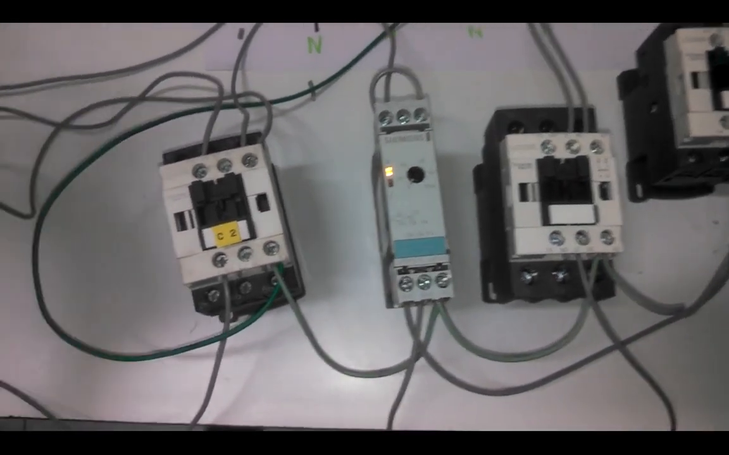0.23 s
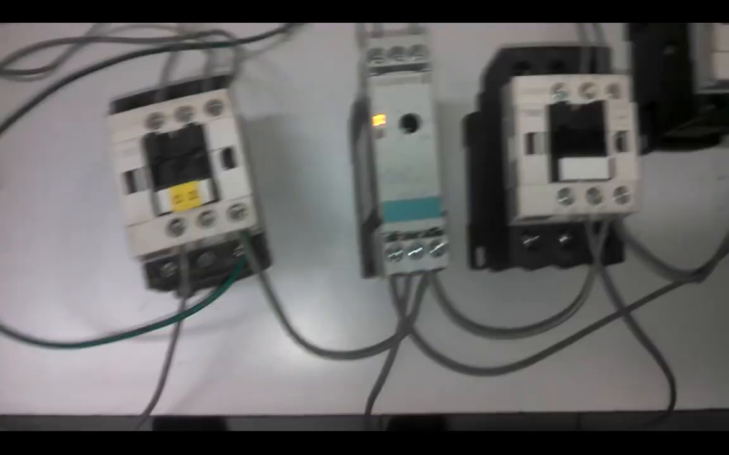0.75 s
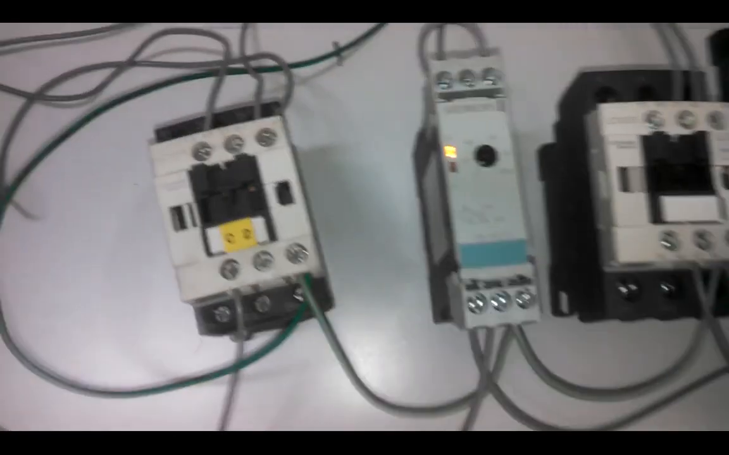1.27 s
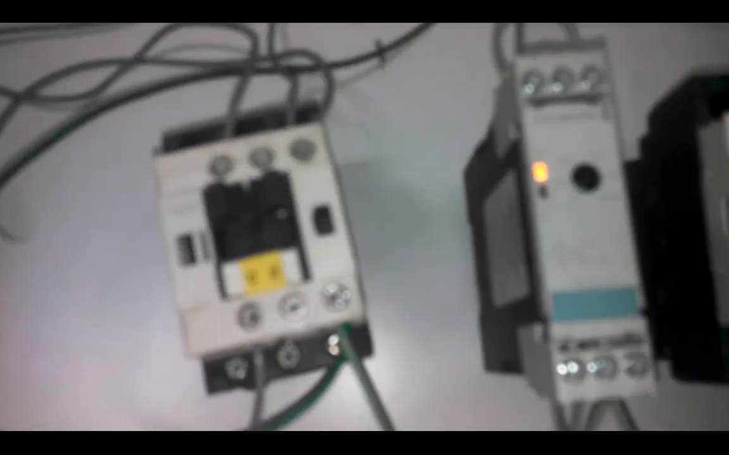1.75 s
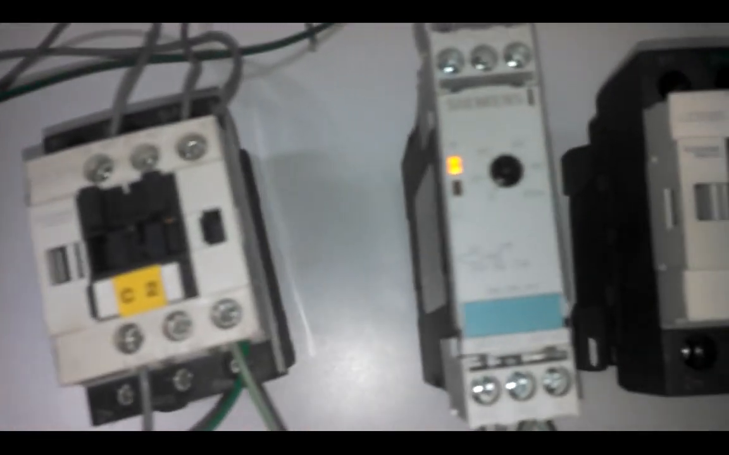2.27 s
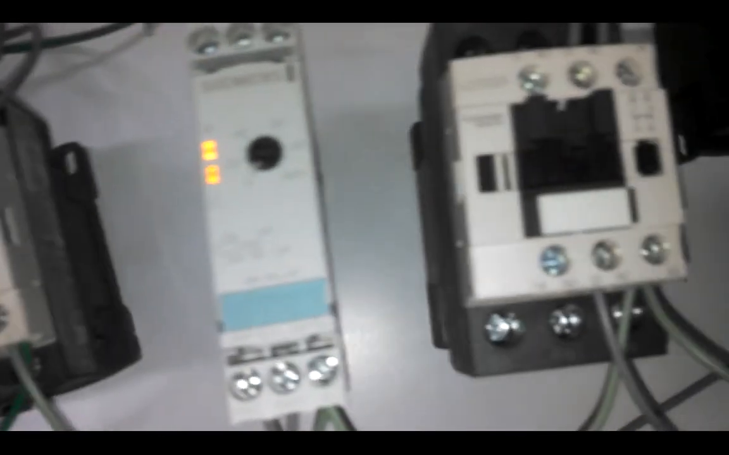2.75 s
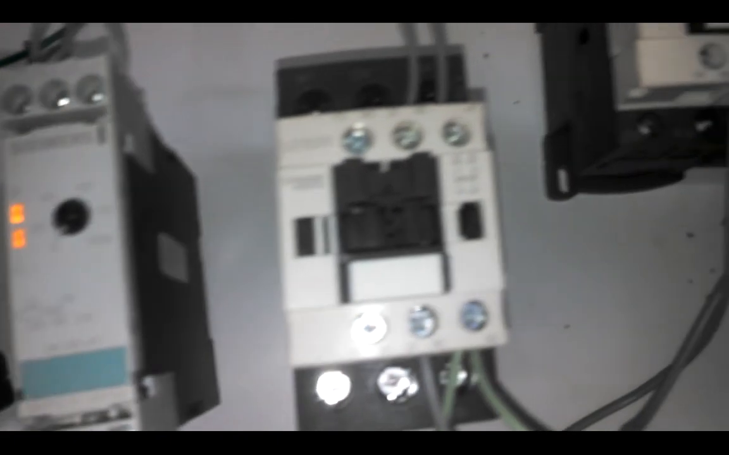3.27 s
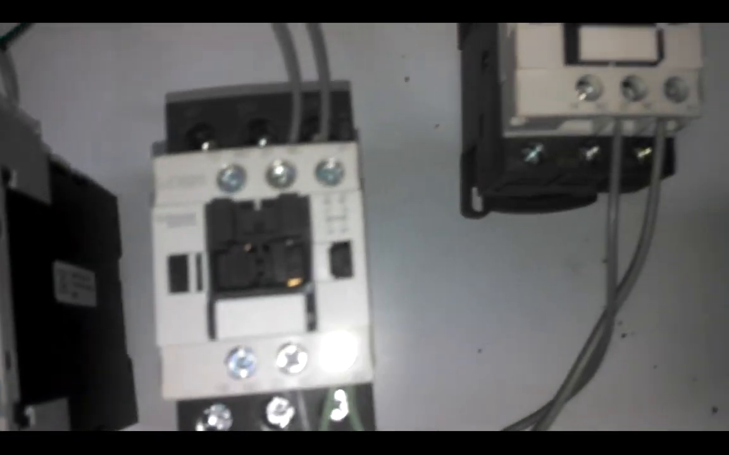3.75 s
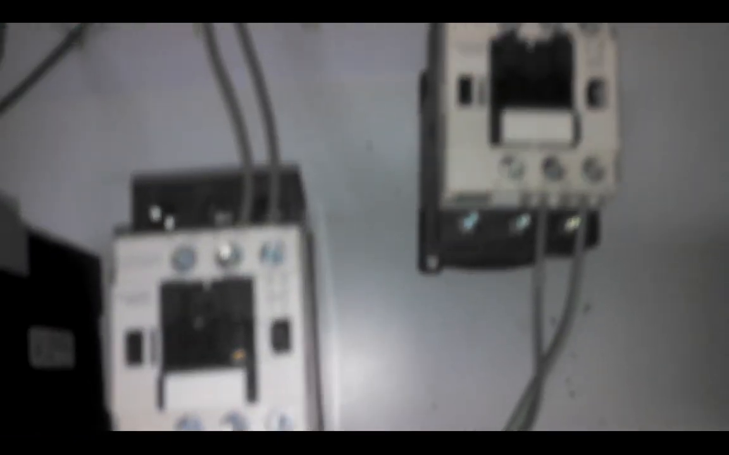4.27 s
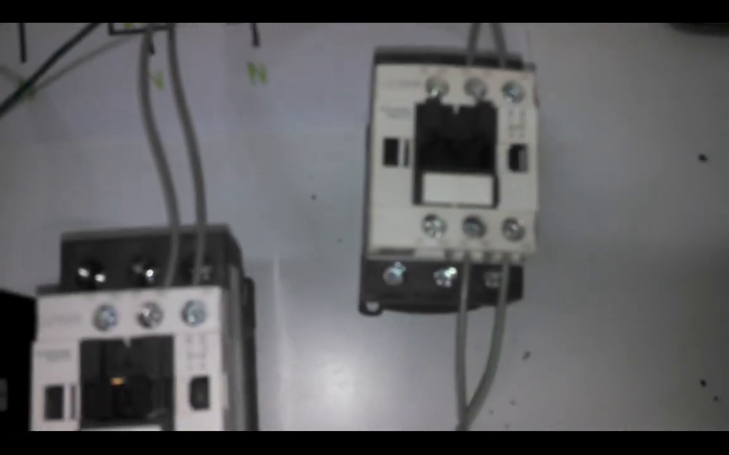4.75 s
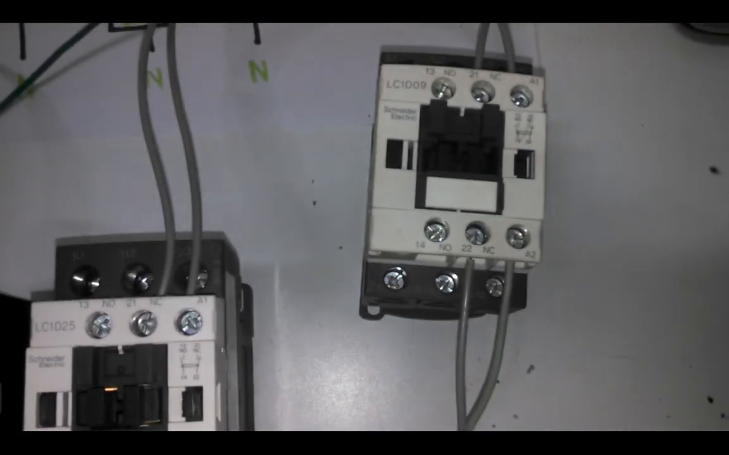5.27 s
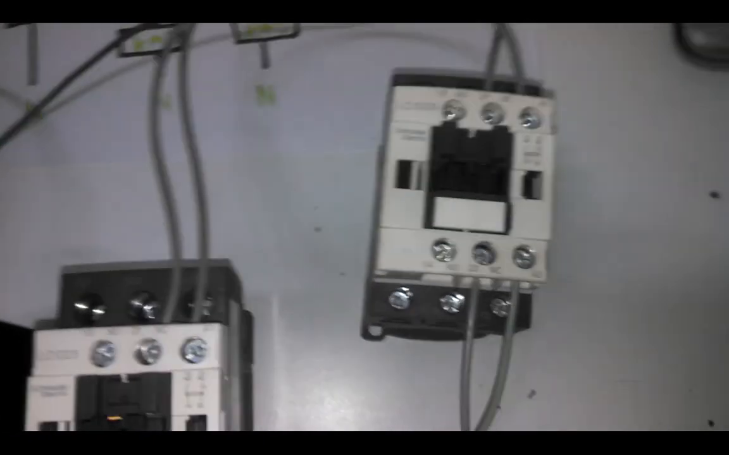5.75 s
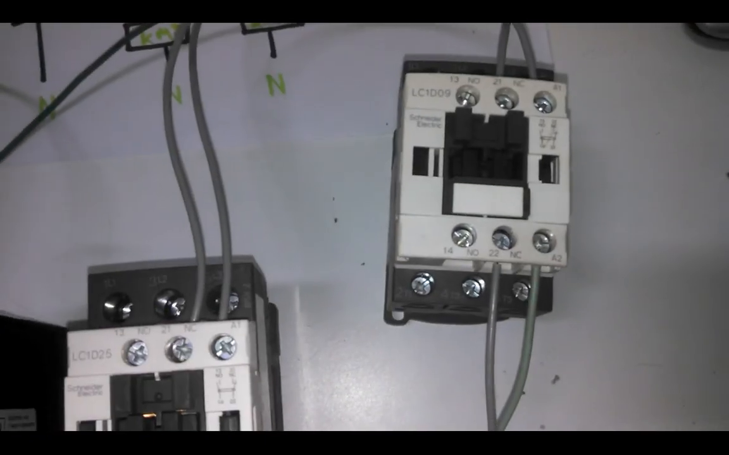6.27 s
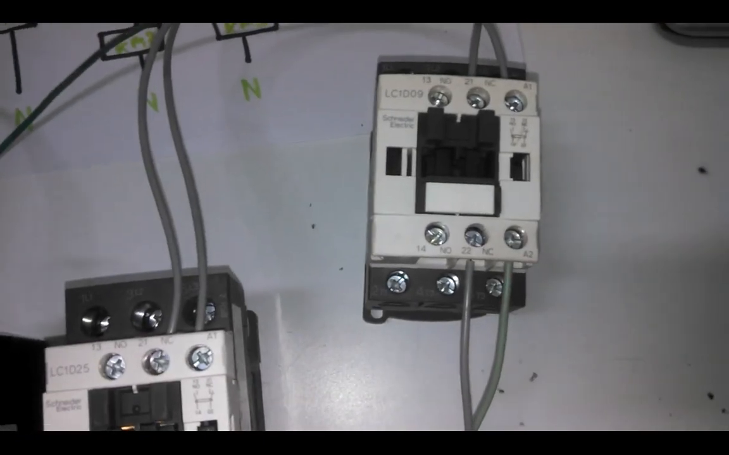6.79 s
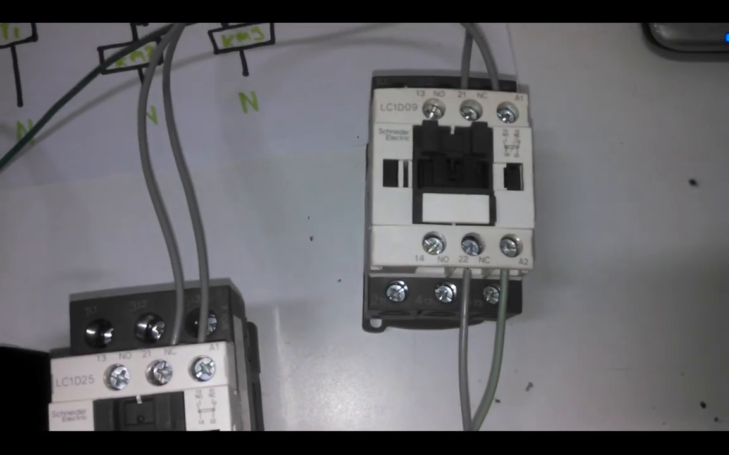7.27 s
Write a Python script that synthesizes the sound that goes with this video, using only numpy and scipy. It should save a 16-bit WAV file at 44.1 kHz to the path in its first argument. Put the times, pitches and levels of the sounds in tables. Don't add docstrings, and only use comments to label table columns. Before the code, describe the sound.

Close handheld phone over a board of contactors in a workshop. A low mains hum and motor drone swell from under a fading clack tail, with tiny wire and relay ticks. Near three seconds a contactor slams in with a hard rattling clack, then chatters in a rough metallic buzz, growing louder as the phone's gain recovers. Just after seven seconds everything clacks off, leaving a small quiver and faint room noise.

```python
import sys
import numpy as np
from scipy import signal
from scipy.fft import rfft, irfft, next_fast_len
from scipy.io import wavfile
from scipy.ndimage import uniform_filter1d

SR = 44100
rng = np.random.default_rng(int(sys.argv[2]) if len(sys.argv) > 2 else 0)


def generate_wav(sig):
    pcm = np.round(np.clip(np.atleast_2d(sig).T, -1, 1) * 32767).astype(np.int16)
    wavfile.write(sys.argv[1], SR, pcm)


def makeup_ratio(level_db):
    decades = np.asarray(level_db, float) / 20
    return 10 ** decades


N = 332028
TIME = np.arange(N) / SR
SEATS_S, SETTLES_S, DROPS_S = 2.86, 2.95, 7.244
WALK_STEP = 64


def curve(rows):
    s, *columns = np.transpose(rows)
    return [np.interp(TIME, s, c) for c in columns]


def spectrum_size_and_hz(size):
    fast = next_fast_len(size)
    return fast, np.fft.rfftfreq(fast, 1 / SR) + 1


def shape(x, hz, gains):
    size, f = spectrum_size_and_hz(len(x) + 8192)
    response = np.interp(np.log(f), np.log(hz), gains)
    return irfft(rfft(x, size) * response, size)[:len(x)]


def noise(points, size=N):
    hz, db = np.transpose(points)
    fast, f = spectrum_size_and_hz(size)
    colour = makeup_ratio(np.interp(np.log(f), np.log(hz), db))
    x = irfft(rfft(rng.standard_normal(fast)) * colour, fast)[:size]
    return x / np.std(x)


def ring(x, hz, t60):
    r, w = np.exp(-np.log(1000) / (t60 * SR)), 2 * np.pi * hz / SR
    return signal.lfilter([0, np.sin(w)], [1, -2 * r * np.cos(w), r * r], x)


def walk(rate):
    k = int(SR / WALK_STEP / rate)
    held = np.repeat(rng.standard_normal(int(N / SR * rate) + 2), k)
    smooth = uniform_filter1d(uniform_filter1d(held, k), k)
    return np.interp(TIME, np.arange(len(held)) * WALK_STEP / SR, 2.3 * np.tanh(smooth))


# t/s, f/Hz
PULL_RATE = [(0, 101.2), (.45, 100.8), (1.15, 98.6), (1.75, 102), (2.3, 101.2), (2.95, 98.8), (3.2, 98.45),
             (3.7, 101.6), (3.95, 102.4), (4.3, 100.9), (5.0, 98.35), (5.25, 98.9), (5.75, 102.4),
             (6.0, 102.1), (6.6, 99.97), (6.9, 98.5), (7.1, 98.9), (7.3, 97.5)]


def turns():
    return np.cumsum(curve(PULL_RATE)[0]) / SR + .35


# multiple of the pull rate, resonance f/Hz, width f/Hz, level/dB before, level/dB
MOTOR_LINES = [(1, 102.5, 3.1, -42.5, -39.5), (2, 204, 4, -35.5, -33), (3, 316.8, 17.2, -36.5, -35),
               (4, 395.6, 9.4, -49, -34.5), (5.745, 578, 17, -44.5, -48.5), (8, 793.5, 20, -66, -46.5),
               (11, 1122, 25, -72, -52)]
# multiple of the pull rate, level/dB, wander level/dB
PLAIN_LINES = [(.48, -28, .8), (9.6, -71, 6)]


def drone():
    pulls, rate = turns(), curve(PULL_RATE)[0]
    switched = np.interp(TIME, [2.84, SEATS_S, 3.5, 4.7], [0, .75, .8, 1])
    stopped_db = np.interp(TIME, [DROPS_S, DROPS_S + 0.016], [0, -31])
    lines = np.zeros(N)
    for k, hz, width, before_db, after_db in MOTOR_LINES:
        db = before_db + (after_db - before_db) * switched + stopped_db + 7.0 + 1.6 * walk(18)
        resonance = 1 / (1 + ((k * rate - hz) / width) ** 2)
        lines += makeup_ratio(db) * resonance * np.sin(2 * np.pi * k * pulls)
    for k, db, wander_db in PLAIN_LINES:
        lines += makeup_ratio(db + wander_db * walk(3.8)) * np.sin(2 * np.pi * k * pulls)
    whine_db = np.interp(TIME, [0, 1.4, 1.7, 2.3, 2.6, 7.5], [-60, -45, -37, -39, -46, -53])
    return lines + makeup_ratio(whine_db + 1.6 * walk(6.8)) * np.sin(2 * np.pi * 538 * TIME)


# f/Hz, level/dB per Hz
SHOP_NOISE = [(32, -6), (45, 3), (70, 1), (120, -14.5), (200, 1.5), (320, -2), (550, -12.5), (900, -16),
              (1400, -24), (2200, -24), (3500, -37.5), (5000, -36), (7000, -44), (9000, -68), (14000, -99)]


def shop():
    boom = ring(rng.standard_normal(N), 142.7, 0.13)
    machines = makeup_ratio(-29.5) * noise(SHOP_NOISE) * makeup_ratio(1.1 * walk(12))
    return machines + makeup_ratio(-33.5) * boom / np.std(boom)


# f/Hz, level/dB per Hz
ROOM_COLOUR = [(60, 10), (300, 8.5), (700, -13.5), (1400, 1), (2500, -12), (5000, -10.5), (8000, -15.5),
               (14000, -58)]
# f/Hz, level/dB per Hz
RATTLE_COLOUR = [(2200, -5.5), (2800, -2.5), (4000, -4), (7000, -5), (9000, -10.5), (14000, -15),
                 (15800, -18)]


def decay(t60):
    t = TIME[:SR]
    dark = noise(ROOM_COLOUR, size=SR) * makeup_ratio(-60 * t / t60)
    bright = noise(RATTLE_COLOUR, size=SR) * makeup_ratio(-60 * t / (0.48 * t60))
    return dark + makeup_ratio(-6.5) * bright


# f/Hz, level/dB per Hz
BUZZ_COLOUR = [(1800, -5.5), (2400, -11), (3300, 0.5), (4200, -3.5), (5000, -4), (6200, -1.5), (6900, -2),
               (7800, -3), (9000, -12), (16000, -97)]


def room(x):
    t, tail = TIME[:SR], decay(1)
    tail_shape = tail * np.minimum(t / 0.023, 1) / np.sqrt(np.sum(tail ** 2))
    wet = makeup_ratio(-4.5) * signal.fftconvolve(x, tail_shape)[:N]
    buzz = makeup_ratio(-14 - 60 * t / 0.94) * noise(BUZZ_COLOUR, size=SR)
    board_boom = makeup_ratio(1.5 - 60 * t / .5) * np.sin(2 * np.pi * 355 * t)
    wet[:SR] += makeup_ratio(-16) * (decay(1.6) + buzz + board_boom)
    return wet


def strike(out, row, rise_s, push):
    s, db, hz, t60 = row
    t = TIME[:SR * 3 // 4]
    pair = np.sin(2 * np.pi * hz * t) + 0.76 * np.sin(2 * np.pi * 1.272 * hz * t)
    rise = np.sin(np.pi / 2 * np.minimum(t / rise_s, 1)) ** 2
    out[:, int(s * SR):][:, :len(t)] += makeup_ratio(db - 9 - 60 * (t / t60) ** 1.12) * push * pair * rise


# t/s, peak level/dB, ring f/Hz, t60/s
TICKS = [
    (.8529, -18, 720, .007),
    (1.2657, -20, 700, .007),
    (1.4636, -29, 5030, .007),
    (1.464, -44, 7200, .004),
    (1.464, -33, 3500, .006),
    (1.4715, -35, 5350, .005),
    (1.4717, -42, 3500, .005),
    (1.472, -46, 1800, .005),
    (3.894, -24, 640, .013),
]
# t/s, peak level/dB, ring f/Hz, t60/s
KNOCKS = [(2.833, -32, 1110, 0.019), (2.8327, -15, 920, 0.029), (2.8404, -32, 1300, 0.027),
          (2.8469, 2, 1190, 0.008), (2.8525, 4.5, 1470, 0.0057), (2.855, -7, 1510, 0.014),
          (2.863, -23, 1410, .012), (2.8674, -20, 1420, .009), (2.872, -23, 1440, .006),
          (2.876, -17, 1500, 0.028), (2.888, -21, 1600, 0.014), (2.899, -38, 1470, .02),
          (2.917, -38, 1300, .012), (5.672, -16, 1440, 0.013), (7.2456, -11, 1300, 0.0096),
          (7.2554, -2, 1060, 0.018), (7.2786, -4.5, 1120, 0.0067), (7.2797, -7, 1910, 0.008)]
# t/s, peak level/dB, t60/s
SHAKES = [(2.830, -21, 0.022), (2.839, -13, 0.037), (2.8449, -17.5, 0.039), (2.8521, -12, 0.011),
          (2.855, -39, 0.15), (2.878, -33, 0.0072), (2.888, -41, 0.018), (2.87, -43.5, 0.95),
          (7.29, -47.5, 0.64), (7.2475, -8, 0.003), (7.25, -16.5, 0.032), (7.272, -31, 0.082),
          (7.2792, -21, 0.0087), (7.312, -38.5, 0.028)]


def blows():
    out = np.zeros((2, N + SR))
    for row in TICKS:
        strike(out, row, .4 / row[2], -1)
    for row in KNOCKS:
        strike(out, row, 0.000065, 1)
    rattle = np.array([noise(RATTLE_COLOUR), noise(RATTLE_COLOUR)])
    air_hz, air_t60 = 8900, 0.055
    dull = np.array([shape(v, [0.94 * air_hz, air_hz, 4.2 * air_hz], [1, .5, 0]) for v in rattle])
    t = TIME[:SR * 3 // 4]
    for s, db, t60 in SHAKES:
        i = int(s * SR)
        shake = makeup_ratio(db - 60 * (t / t60) ** 1.71) * np.minimum(t / 0.00017, 1)
        j = i % (N - len(t))
        low, top = dull[:, j:j + len(t)], (rattle - dull)[:, j:j + len(t)]
        out[:, i:i + len(t)] += shake * (low + top * makeup_ratio(-60 * t / air_t60))
    return out[:, :N]


# f/Hz, level/dB per Hz
FIZZ_COLOUR = [(2000, 1), (4000, -6.5), (8000, -7.5), (10000, -24.5), (11800, -9), (13300, -26),
               (14600, -13), (15300, -42)]


def fizz():
    x = noise(FIZZ_COLOUR)
    edges = [(1500, 8000), (8000, 9000), (9000, 10200), (10200, 11200), (11200, 12800), (12800, 14000),
             (14000, 15500)]
    thin_db = -0.7 * (curve(PULL_RATE)[0] - 100)
    out = np.zeros(N)
    for k, edge in enumerate(edges):
        band = signal.sosfilt(signal.butter(3, edge, "band", fs=SR, output="sos"), x)
        out += makeup_ratio(min(k + 1.5, 2.3) * walk(16) + thin_db * (k > 1)) * band
    return out


# t/s, level/dB, lean level/dB
LOOSENESS = [(3.05, -9, 9), (3.3, -0.5, 4.5), (3.45, -5.5, 4), (3.7, -2, -1), (3.91, 4, 4),
             (4.45, -1, -0.5), (4.72, 1.5, 2.5), (4.9, 3, -2), (5.2, -3.5, 0.5), (5.44, -3.5, 2.5),
             (5.76, -0.5, 3), (5.9, 1, 3.5), (6.03, 1.5, 0.5), (6.2, 1, -0.5), (6.33, -2, 2), (6.47, 1, 0),
             (6.64, 1, 2.5), (6.9, 3, -0.5), (7.24, 1.5, 0)]
# t/s, depth level/dB, length/s
GRIPS = [
    (4.924, -5.5, 0.029),
    (5.136, -3, 0.043),
    (5.61, -3, 0.02),
    (6.37, 1, 0.05),
    (6.886, -4.5, 0.048),
    (7.097, -11, 0.018),
    (7.213, -6.5, 0.048),
]
# f/Hz, level/dB, t60/s
ARMATURE_MODES = [(1300, 11, 0.031), (1522.4, 4.5, 0.057), (1213, 1.5, 0.072), (1601.5, 6, 0.044),
                  (1704, 2, 0.031), (1872, 4.5, 0.07), (2052, 10, 0.03)]
# f/Hz, level/dB, t60/s
PLATE_MODES = [(3850, 7, 0.0041), (6800, -4.5, 0.017)]
# multiple of the pull rate, level/dB
CORE_HUM = [(1, -7.5), (5, -12), (6, -19), (7, -15.5), (9, -20.5), (10, -16)]


def chatter():
    loose_db, lean_db = curve(LOOSENESS)
    loose_db = loose_db + walk(14)
    grip_db = sum(db * np.exp(-((TIME - s) / length) ** 2) for s, db, length in GRIPS)
    ring_db = -30 + loose_db + grip_db
    buzz_db = -39 + 0.27 * loose_db + 0.22 * grip_db

    pulls = turns()
    at = np.flatnonzero(np.diff(pulls.astype(int)))
    chance = rng.standard_normal((len(at) + 1, 3))
    knocks = np.zeros(N)
    late = (1.6 * chance[1:, 0]).astype(int)
    knocks[at + late] = makeup_ratio(1.64 * chance[1:, 1] + 0.12 * (-1) ** np.arange(len(at)))
    knocks += 0.007 * rng.standard_normal(N)
    plates = sum(makeup_ratio(db) * ring(knocks, f, t60) for f, db, t60 in PLATE_MODES)

    knocks = ring(knocks, 1410, .006)
    body = np.zeros(N)
    for k, (f, db, t60) in enumerate(ARMATURE_MODES):
        drift_db = 1.3 * walk(7) + lean_db * np.tanh((f - 1420) / 180)
        body += (-1) ** k * makeup_ratio(db + drift_db) * ring(knocks, f, t60)

    puff = .13 + makeup_ratio(3.2 * chance[pulls.astype(int), 2]) * np.cos(np.pi * (pulls - .27)) ** 12
    buzz = np.array([puff * noise(BUZZ_COLOUR) + makeup_ratio(1.5) * fizz() for _ in range(2)])
    buzz += makeup_ratio(-4) * plates / np.std(plates)

    core = np.zeros(N)
    for k, db in CORE_HUM:
        phase = rng.uniform(0, 2 * np.pi)
        core += makeup_ratio(db + 3.4 * walk(13)) * np.sin(2 * np.pi * k * pulls + phase)

    on = np.interp(TIME, [SEATS_S, SETTLES_S, DROPS_S, DROPS_S + 0.0059], [0, 1, 1, 0])
    body = makeup_ratio(-0.06) * body / np.std(body) + core
    heard = on * (makeup_ratio(ring_db) * body + makeup_ratio(buzz_db + 4.0) * buzz / np.std(buzz))
    return signal.sosfilt(signal.butter(12, 14900, fs=SR, output="sos"), heard)


# t/s, peak level/dB, f/Hz, half length/s
QUIVERS = [
    (7.288, -17.5, 1450, .0036),
    (7.314, -33, 1350, .005),
    (7.337, -36, 1400, .012),
]


def quivers():
    out = np.zeros(N)
    for s, db, hz, half in QUIVERS:
        out += makeup_ratio(db) * np.exp(-((TIME - s) / half) ** 4) * np.sin(2 * np.pi * hz * TIME)
    return out


# t/s, level/dB it falls to, hold/s
DUCKS = [
    (-.1, -23.5, .05),
    (2.839, -17, .5),
    (7.242, -4.5, .4),
]


def gain():
    fall_s, creep_db_per_s, ceiling_db = 0.058, 9.5, 5
    db = np.zeros(N)
    for s, low_db, hold in DUCKS:
        back = np.minimum(low_db + creep_db_per_s * np.maximum(TIME - s - hold, 0), ceiling_db)
        db = db + (back - db) * np.clip((TIME - s) / fall_s, 0, 1)
    return makeup_ratio(db)


# f/Hz, difference minus sum level/dB
PORTS = [(40, -17.5), (120, -17), (256, -16.5), (550, -3), (900, -7.5), (1400, 3.5), (2180, 0.5),
         (3150, -0.5), (7140, -0.5), (11000, -0.5), (16000, 1)]
SHADE = [.2, 0, 0, .1, .25, -.5, -.65, .65, .35, .1, 0]


def scene():
    scatter = rng.standard_normal(400) * makeup_ratio(-60 * TIME[:400] / 0.026)
    scatter /= np.sqrt(np.sum(scatter ** 2))
    hum, hits = chatter(), blows() / gain()
    near, aside = hum + hits + quivers() / gain()
    sent = makeup_ratio(-15) * hum + hits
    lines = drone()
    total = near + lines + room(sent[0]) + shop()
    other = signal.fftconvolve(aside + 0.5 * lines, scatter)[:N] + room(sent[1]) + shop()
    (hz, db), shade = np.transpose(PORTS), np.array(SHADE)
    shaded = shape(total, hz, makeup_ratio(db) * shade)
    side = shaded + shape(other, hz, makeup_ratio(db) * np.sqrt(1 - shade ** 2))
    return np.array([total + side, total - side]) / 2


# f/Hz, share of the other side taken away
CROSS_FEED = [(1500, .99), (2800, .93), (5500, .75), (8300, .55), (14000, .5)]


def widen(x):
    hz, share = np.transpose(CROSS_FEED)
    crossed = [shape(v, hz, np.clip(share, 0, .99)) for v in x[::-1]]
    return x - np.pad(crossed, ((0, 0), (16, 0)))[:, :N]


# t/s, left minus right level/dB
SWING = [(0, -2), (1.5, -3), (2.6, -2.5), (3.2, -1.3), (4, -2.5), (4.8, -1), (5.7, -2.4), (6.8, -1.1)]


def swing(x):
    return x * makeup_ratio(curve(SWING)[0] * np.array([[.5], [-.5]]))


def low_pass(x):
    return signal.sosfilt(signal.butter(12, 15500, fs=SR, output="sos"), x)


def record(dry):
    x = signal.sosfilt(signal.butter(6, 38, "high", fs=SR, output="sos"), dry) * gain()
    mix = np.clip(swing(widen(x)), -1, 1)
    return low_pass(mix)


dry = scene()
out = record(dry)
generate_wav(out)
```